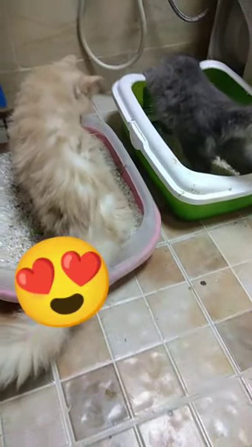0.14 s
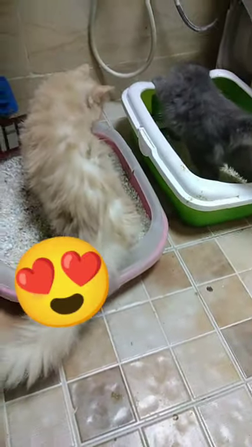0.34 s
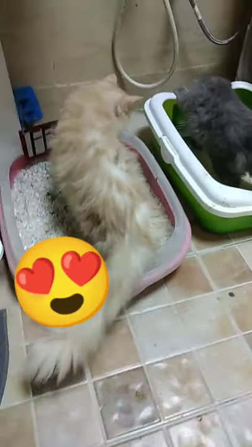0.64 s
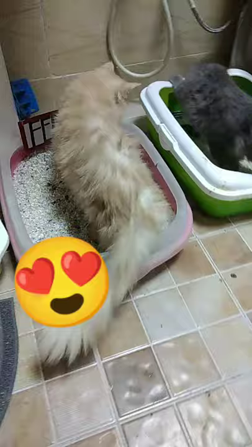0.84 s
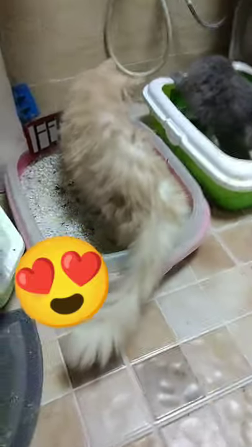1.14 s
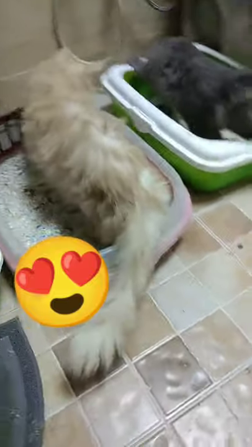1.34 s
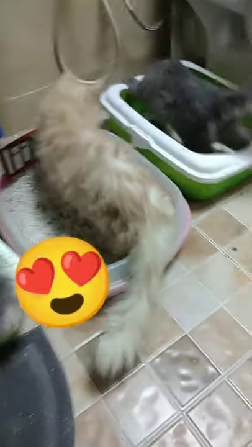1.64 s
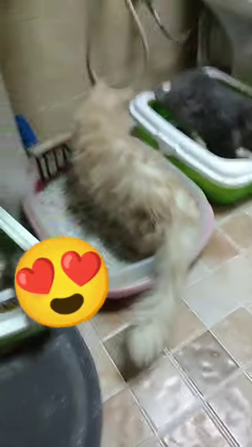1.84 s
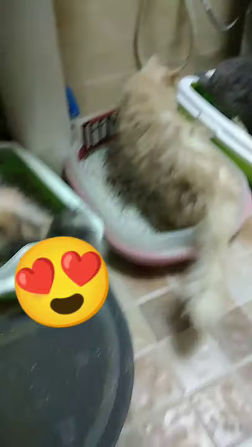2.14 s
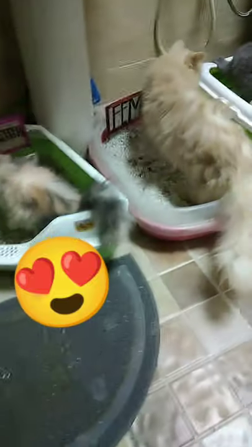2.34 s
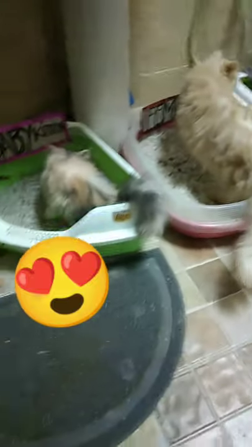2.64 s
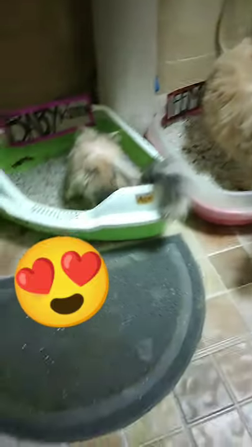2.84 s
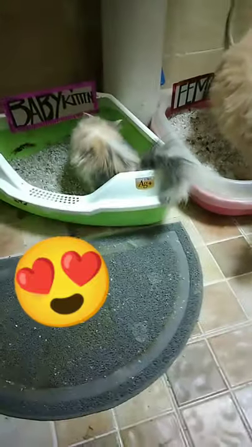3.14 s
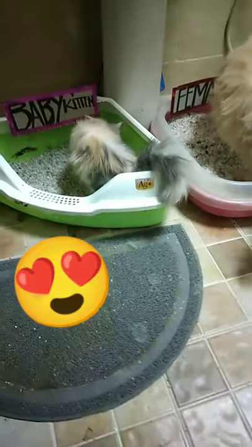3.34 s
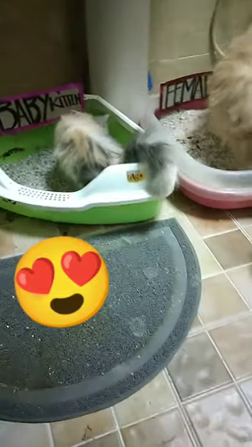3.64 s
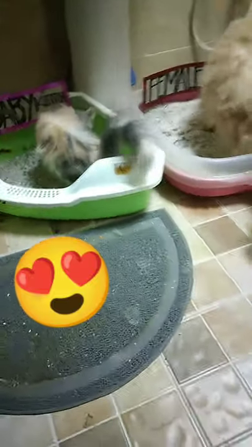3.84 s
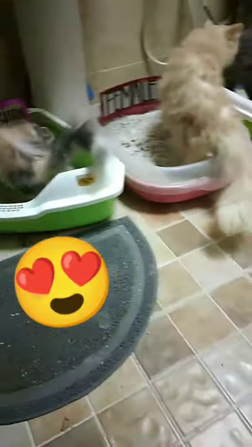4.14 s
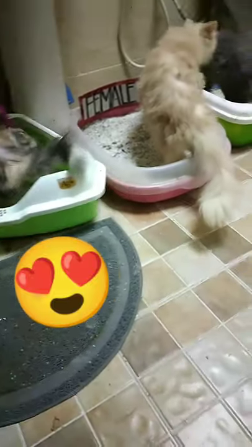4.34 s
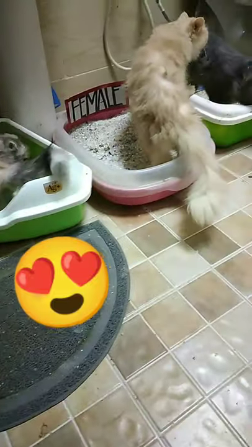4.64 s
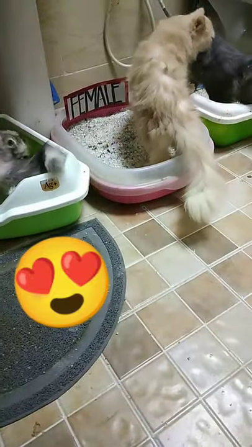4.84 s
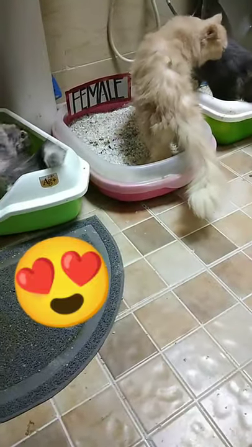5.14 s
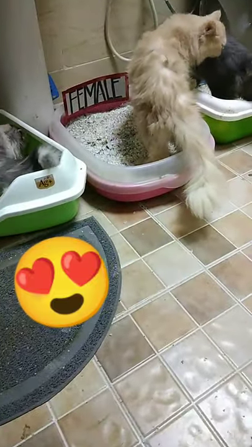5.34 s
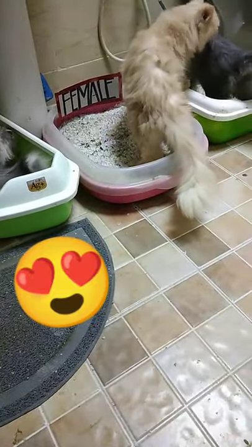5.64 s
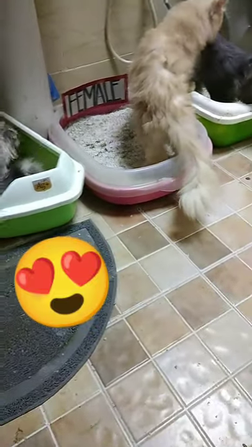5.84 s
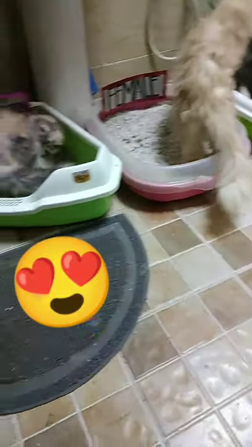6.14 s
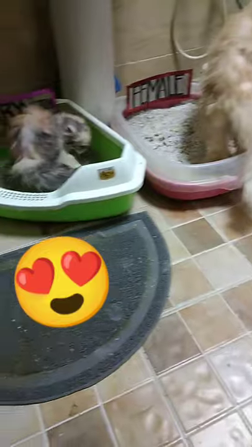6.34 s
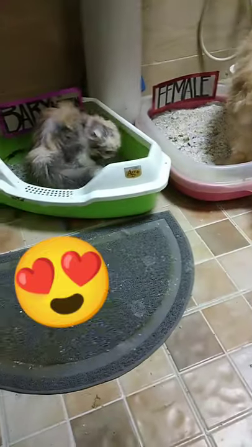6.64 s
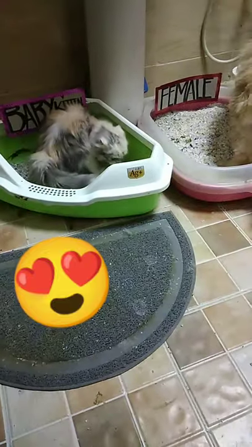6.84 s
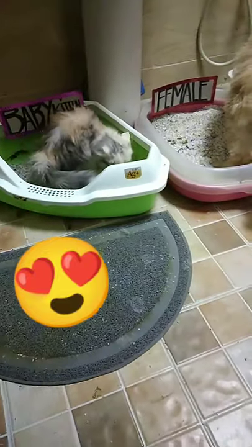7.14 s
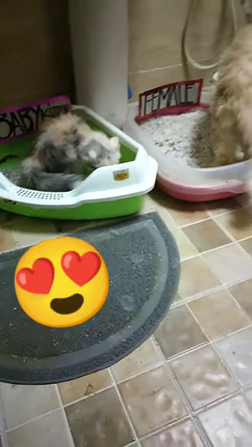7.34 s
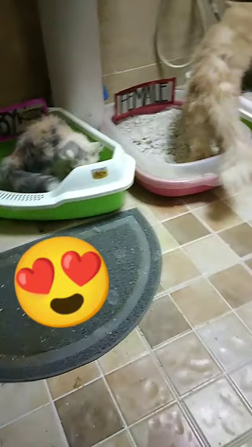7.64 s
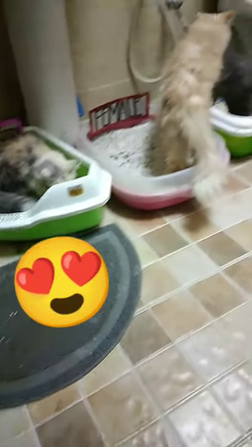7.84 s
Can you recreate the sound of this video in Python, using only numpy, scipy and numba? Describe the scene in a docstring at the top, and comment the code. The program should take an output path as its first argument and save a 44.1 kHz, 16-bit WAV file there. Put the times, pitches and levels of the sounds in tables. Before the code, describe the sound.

Over a low indoor hum, paws rake dry litter pellets in short crisp strokes, with plastic tray knocks and a loud clatter at the end.

```python
"""Cats dig and shift in granular litter in plastic trays on a tiled floor, a metre or two from a hand-held phone.
Pellets rattle in dense showers of tiny noisy impacts, with finer dust above and a ringing tray below.
Noise cracks tick on the tray walls and soft pushes ring its panels; motor tones hum and filtered air rumbles behind.
The phone turns slowly among the standing waves; its two ports ring at their own pitch. Faint treble drops out."""
import sys
import numpy as np
from scipy import signal
from scipy.fft import rfft, irfft
from scipy.io import wavfile
from scipy.ndimage import uniform_filter1d
from numba import njit

SR = 44100
rng = np.random.default_rng(int(sys.argv[2]) if len(sys.argv) > 2 else 0)


def decibels_to_gain(level_db):
    """Convert a level in decibels to a linear amplitude gain (20 dB per decade)."""
    exponent = np.asarray(level_db, float) / 20
    return 10 ** exponent


def pcm_store(signal):
    """Save signal as 16-bit PCM."""
    levels = np.round(np.clip(np.atleast_2d(signal), -1, 1) * 32767)
    wavfile.write(sys.argv[1], SR, levels.astype(np.int16).T)


N = 352359
T = np.arange(N) / SR
PORT_LAG = 20  # samples by which the right port hears the trays later


def level(x, db):
    """Set the rms level over all channels together."""
    return x * decibels_to_gain(db) / np.sqrt(np.mean(x ** 2))


def shape(table, hz):
    """Read (Hz, dB) points on a log-frequency axis."""
    f, db = np.transpose(table)
    return np.interp(np.log(hz + 1), np.log(f), db)


def colour(x, table):
    """Causal filter with the given spectrum, from the cepstrum of its log gain."""
    log_gain = np.log(decibels_to_gain(shape(table, np.arange(2049) * SR / 4096)))
    cep = irfft(log_gain)
    # folding the cepstrum forward in time gives minimum phase
    cep[1:2048] *= 2
    cep[2049:] = 0
    impulse = irfft(np.exp(rfft(cep)))[:2048]
    return signal.fftconvolve(x, np.atleast_2d(impulse), axes=-1)[:, :N]


def tail(t60_s, size=N // 8):
    """Scattered echoes that die away, different at each port; energy 1."""
    h = rng.standard_normal((2, size)) * 1000. ** (-T[:size] / t60_s)
    return h / np.sqrt(np.sum(h ** 2, axis=1, keepdims=True))


def walk(rate):
    """Random levels held 1 / rate s and slewed twice; spread near 1."""
    k = int(SR / rate)
    held = np.repeat(rng.standard_normal(N // k + 1), k)
    return 1.39 * uniform_filter1d(uniform_filter1d(held, k), k)[:N]


def sides(pan_db):
    """Left and right gains for a left minus right difference in dB."""
    return decibels_to_gain(np.array([pan_db, -pan_db]) / 2)


@njit
def svf(x, hz, sharp):
    """Band-pass whose centre moves; gain 1 at the centre."""
    y, b, l, k = np.empty(len(x)), 0., 0., 1 / sharp
    for i in range(len(x)):
        g = np.tan(np.pi * hz[i] / SR)
        v = (b + g * (x[i] - l)) / (1 + g * (g + k))
        b, l, y[i] = 2 * v - b, l + 2 * g * v, k * v
    return y


# Colour of the fan rumble, before and after the phone's turn.
# Each row: frequency in Hz, relative level in dB before, relative level in dB after.
RUMBLE_COLOUR = [(25, -47, -28), (57.6, -8.5, -15), (104, -17, -6), (136, -6, -3), (256, -2, -1.2),
                 (400, -6.5, -7.5), (730, -11.5, -8), (930, -19.5, -18), (1720, -30.5, -24.5),
                 (2300, -41, -40), (2700, -32.5, -35), (3800, -54, -51.5), (7200, -39.5, -32),
                 (14000, -49.5, -63.5)]


def air(turn):
    """Fan rumble; long waves are alike at both ports, short ones and the hand's deepest shake unrelated."""
    one, own = rng.standard_normal(N), rng.standard_normal((2, N))
    hz = np.arange(N // 2 + 1) * SR / N
    # likeness fades above some 560 Hz and again below 60 Hz
    alike = np.exp(-(hz / 560) ** 2) * .93 * np.minimum(.5 + hz / 120.0, 1)
    mix = irfft(np.sqrt(alike) * rfft(one) + np.sqrt(1 - alike) * rfft(own), N)
    left_lift = [(300, .1), (700, 0.89), (1300, 9.94), (2500, 5.8), (4400, 1.6)]  # (Hz, dB)
    mix[:1] = colour(mix[:1], left_lift)
    before, after = (colour(mix, np.array(RUMBLE_COLOUR)[:, [0, k]]) for k in (1, 2))
    flutter = decibels_to_gain(1.0 * walk(1.593))
    return level(before + (after - before) * turn, -48) * flutter


# Motor tones at multiples of twice the mains, some with a close neighbour that beats against them.
# Each row: multiple, offset in shaft turns, left level in dB before and after the phone's turn,
# right level in dB before and after, lead of the left port in radians.
MOTOR_TONES = [(1, -0.084, -65.5, -62, -71, -62.5, -0.18), (1, 0.35, -62.5, -57.5, -70.5, -58.5, 0.24),
               (2, -1, -64.5, -56.5, -66, -60.5, 0.4), (2, 0, -52, -61, -51, -54, 0.22),
               (3, -1, -50.5, -52.5, -47.5, -55, -0.35), (3, 0, -42, -49, -44, -47.5, 0.35),
               (4, 0, -55, -64, -52, -65.5, 0.27), (5, 0.1, -71.5, -73, -62.5, -66.5, 0.05),
               (6, 0, -67.5, -63, -85, -61.5, 0.4), (7, 0, -71.5, -70, -62, -62, -0.6),
               (8, 0.08, -64, -64.5, -82.5, -69.5, 1), (10, 0.19, -79, -76, -66, -67.5, 2.5)]
# A second, noisy tone. In order: pitch in Hz, width in Hz, level in dB before and after the phone's turn.
WAVERING_TONE = (239, 2.5, -69, -57)


def hum(turn):
    """Wavering motor tones whose standing waves change as the phone turns."""
    mains_hz, shaft_hz = 50.05, 18.85
    out = np.zeros((2, N))
    for (k, off, l0_db, l1_db, r0_db, r1_db, lead), start in zip(MOTOR_TONES, rng.random(len(MOTOR_TONES))):
        phase = 2 * np.pi * ((2 * k * mains_hz + off * shaft_hz) * T + start)
        # tones tied to the shaft waver with its speed
        phase = phase + off * 0.54 * walk(1.8)
        waver = np.sqrt(2) * decibels_to_gain(0.35 * k * walk(2.483) + 1.2 * walk(11))
        out[0] += waver * decibels_to_gain(l0_db + (l1_db - l0_db) * turn) * np.sin(phase + lead)
        out[1] += waver * decibels_to_gain(r0_db + (r1_db - r0_db) * turn) * np.sin(phase)
    hz, width, before_db, after_db = WAVERING_TONE
    drone = signal.lfilter(*signal.iirpeak(hz, hz / width, fs=SR), rng.standard_normal(N))
    return out + level(drone, 0) * decibels_to_gain(before_db + (after_db - before_db) * turn)


# Soft paw pushes on a tray.
# Each row: start in seconds, ring level in dB ahead of its fades, pitch in Hz, end pitch in Hz,
# 60 dB decay time in seconds, left minus right in dB.
PUSHES = [(.81, -61.5, 2700, 2700, 0.42, 6), (3.735, -36.5, 240, 225, 0.17, -5),
          (3.75, -45.5, 610, 600, 0.42, -3), (.47, -53, 560, 575, 0.81, 0), (.92, -48, 620, 615, 0.22, 0),
          (1.25, -49, 623, 560, 0.32, 4), (4.14, -43, 500, 400, 0.13, .1), (4.68, -58, 2430, 2360, 0.52, 7),
          (4.9, -53, 1790, 1720, 0.2, 7.5), (5.09, -58.5, 2060, 2000, 0.63, 10),
          (6.615, -46.5, 1290, 1080, 0.31, 8), (7.8, -41.5, 241, 224, 0.5, -2)]


def knocks():
    """A padded, rubbing push excites one panel of the tray."""
    out, rub = np.zeros((2, N)), rng.standard_normal(N)
    for s, db, hz, end_hz, t60_s, pan_db in PUSHES:
        i = int(s * SR)
        t = T[:min(SR // 2, N - i)]
        fade = 1000. ** (-t / t60_s)
        onset = 1 - np.exp(-t / (0.017 * t60_s))
        pitch_hz = end_hz + (hz - end_hz) * fade
        ring = level(svf(rub[i:i + len(t)], pitch_hz, 15.6), db)
        out[:, i:i + len(t)] += onset * fade * ring * sides(pan_db)[:, None]
    return out


# Single pellets and claws on the tray wall.
# Each row: start in seconds, crack level in dB ahead of the colours, left minus right in dB,
# tray boom in dB against the crack, snap in dB against the crack.
WALL_TICKS = [(0.924, -45, 16, -30, -6.5), (0.9953, -37.5, -2, -32, -15), (1.073, -34.5, -7, -13.5, -37),
              (1.217, -29, 7, -13, -35), (1.239, -33, -1, -13, -24), (1.34, -32, 2, -21, -25),
              (1.505, -41, 22, -9, -18), (1.827, -25, 1, -20, -18), (2.0272, -32.5, 9, 0.5, -19),
              (2.0404, -23.5, 10, -2, -25), (2.2566, -49, 8, -10, 2), (2.2849, -5, 9, -12, -9),
              (2.305, -21, 8, -20, -25), (2.5105, -46, 6, -13, -22), (2.744, -31.5, 19.5, -36, -37.5),
              (2.761, -30.5, 11.5, -16, -24), (2.801, -23, 19.5, -33, -16), (2.813, -26, 7, -13, -25),
              (2.820, -29, 5, -15, -25), (2.826, -22, 5, -20, -21), (2.834, -27, 5, -21, -23),
              (2.8387, -22, 4, -24, -28), (3.328, -36, 0, -13, -16), (3.439, -29, 4, 1, -30),
              (3.4472, -14.5, 14, -18, -33), (3.473, -26, 10, -28, -28), (3.489, -25, 8, -20, -28),
              (3.5707, -29.5, -6, -5.5, -25), (3.661, -20, 14, -30, -23), (3.696, -24, 12, -15, -26),
              (3.701, -26, 11, -18, -26), (3.719, -27, 5, -6, -26), (3.926, -37.5, 24, -20, -22),
              (4.0983, -32, 21.5, -16, -17), (4.1414, -37, 8.5, 2, -24), (4.158, -35.5, 5, -2.5, -25),
              (4.3972, -29, -2, -12, -18), (4.634, -32, 7, -25.5, -26), (4.9307, -33.5, 9.5, -24.5, -30.5),
              (5.7517, -39.5, -2.5, -4.5, -44), (6.101, -39, 13, -11.5, -16), (6.84, -36, 9, -15, -22),
              (6.96, -33, 6, -20, -22), (7.036, -33.5, 7, -15, -11), (7.5007, -33, 21.5, -23, -24),
              (7.5583, -26.5, 12, -13, -29), (7.7904, -26, -1, 1, -22), (7.8007, -12, -4, -2.5, -30),
              (7.804, -10.5, 0, -6, -28), (7.8254, -20, 7, -20, -22), (7.833, -2.5, 10, -37, -18),
              (7.8343, -8, 6, -3.5, -26), (7.954, -20, 5, -25, -24)]
# Colour of the bright crack. Each row: frequency in Hz, relative level in dB.
CRACK_COLOUR = [(3500, -32.5), (5000, -12.5), (6500, 0), (8000, -0.5), (9500, -6.5), (11000, -20),
                (13000, -43.5)]
# Colour of the dull tray wall. Each row: frequency in Hz, relative level in dB.
WALL_COLOUR = [(700, -23.5), (1300, -6), (1900, -2), (2600, -3.5), (3700, -8.5), (4800, -4), (6200, -20.5)]
# Colour of the snap, and of the fine dust in the digging. Each row: frequency in Hz, relative level in dB.
DUST_COLOUR = [(8000, -27.5), (9500, 3), (11000, 2), (12500, -6.5), (14500, -13.5), (16000, -22)]


def ticks():
    """Each tick is a crack of a few milliseconds, with its own fine grain, then the tiled room."""
    bright, dull, snap = np.zeros((3, 2, N + 1024))
    fade = 1000. ** (-T[:1024] / 0.013)
    grains = rng.standard_normal((len(WALL_TICKS), 3, 1024))
    for (s, db, pan_db, tray_db, snap_db), grain in zip(WALL_TICKS, grains):
        i = int(s * SR)
        # part of the crack is common to both ports, the right one a little later
        crack = level((grain[0] + 1.02 * grain[1:]) * fade, db) * sides(pan_db)[:, None]
        crack[1] = np.roll(crack[1], PORT_LAG)
        bright[:, i:i + 1024] += crack
        dull[:, i:i + 1024] += crack * decibels_to_gain(tray_db)
        # the highest part dies first
        snap[:, i:i + 1024] += crack * fade * decibels_to_gain(snap_db)
    direct = decibels_to_gain(-23) * colour(bright, CRACK_COLOUR)
    direct = direct + decibels_to_gain(-7.5) * colour(dull, WALL_COLOUR)
    direct = direct + decibels_to_gain(-7.5) * colour(snap, DUST_COLOUR)
    return direct + decibels_to_gain(-8.5) * signal.fftconvolve(direct, tail(0.42), axes=-1)[:, :N]


def shower(per_s, spread_db, smear_s, room_db, alike):
    """Pellet collisions of very uneven size all over the trays, blurred by the walls and the tiles."""
    # three streams, each with per_s hits a second: one shared, one for each port
    hit = rng.random((3, N)) < per_s / SR
    size_db = spread_db * np.minimum(rng.exponential(size=(3, N)), 4.5)
    grains = hit * rng.standard_normal((3, N)) * decibels_to_gain(size_db)
    # some fall where both ports hear them alike, some nearer to one
    shared = np.array([grains[0], np.roll(grains[0], PORT_LAG)])
    grains = alike * shared + grains[1:]
    echo = tail(smear_s)[:1] + decibels_to_gain(room_db) * tail(0.2)
    return signal.fftconvolve(grains, echo, axes=-1)[:, :N]


# Cats shifting their weight: a continuous bed, gliding from row to row.
# Each row: time in seconds, relative pellet rattle in dB, tray boom in dB against the rattle,
# fine dust in dB against the rattle, left minus right in dB, tray resonance in Hz about which the ring drifts.
WEIGHT_SHIFTS = [(0, -79, 10, -12, 9, 2360), (.7, -81.5, -1, -9.5, 10, 2370),
                 (.8, -72.5, -7, -26, 14, 2700), (1.0, -60, -5, -11.5, 4, 2390),
                 (1.145, -58, -10.5, -19.5, 4.5, 2800), (1.19, -54, -1, -18, 8.5, 2950),
                 (1.38, -53.5, 0, -20.5, 7.5, 3030), (1.5, -62, 1, -14, 7.5, 2800),
                 (1.65, -64, -4, -18, 9.5, 2460), (2.701, -66, -11, -24, 20, 2350),
                 (3.2, -71, 3, -27.5, 17, 2380), (4.0, -59.5, -3.5, -28, 7, 2460),
                 (5.3, -65.5, 0, -25, 9.5, 2320), (6.35, -63.5, -2.5, -34.5, 10, 2300),
                 (6.6, -62, -9, -29, 6, 2410), (6.8, -60, 3, -28, 8, 2420),
                 (7.03, -55.5, 3.5, -19.5, 4.5, 2080), (7.26, -57, 2.5, -15, 4, 2220),
                 (7.42, -63, 1, -25, 6.5, 2300), (8, -56, -7, -24, 7, 2860)]
# Paw strokes through the litter.
# Each row: start in seconds, push length in seconds, relative pellet rattle in dB, tray boom in dB against
# the rattle, fine dust in dB against the rattle, left minus right in dB of the push and fast drop.
PAW_STROKES = [(0.149, 0.024, -68, -18, -17, 12), (0.345, 0.026, -67, -11, -22, 7),
               (0.598, 0.04, -68, -16, -20, 7), (0.71, 0.034, -64.5, -14.5, -20, 1),
               (0.882, .03, -69, -15, -20, 4), (1.809, .04, -37.5, -7.5, -15, 3.5),
               (2.023, 0.021, -42, 0, -15, 8), (2.279, 0.021, -35.5, -2, -30, 1),
               (2.496, 0.03, -47, -5.5, -15, 12), (2.78, 0.05, -34, -7.5, -17, 6),
               (3.295, 0.053, -53, -6, -19, 4), (3.424, 0.045, -35, -8, -17, 4),
               (3.59, 0.072, -40, -9.5, -13, 13.5), (3.689, 0.025, -43.5, -5.5, -19, 5),
               (4.138, 0.035, -56, -4.5, -13, 5), (4.389, 0.012, -55.5, -14, -15, 11),
               (4.626, 0.01, -59, -17, -35, 7), (4.924, 0.012, -58.5, -11.5, -35, 8),
               (5.082, 0.015, -56.5, -14, -44, 3), (5.33, 0.023, -65, -20, -31, 8),
               (5.47, 0.013, -61, -12, -36, -3), (5.758, 0.015, -54, -14, -40, -2),
               (6.094, 0.015, -56, -10.5, -16, 12), (6.377, 0.059, -67, -2.5, -26.5, 0.5),
               (6.669, 0.052, -67.5, 2, -6.5, 13), (6.81, 0.033, -59.5, -6, -35, 9),
               (7.137, 0.063, -50.5, -4, -18.5, 0), (7.547, 0.037, -38, -6, -13.5, 7.5),
               (7.779, 0.032, -36.5, -2.5, -12, 18), (7.815, .022, -21.5, -3.5, -21, 4.5)]


def stirring():
    """Left and right strength of rattle, tray and dust; unrelated stirrings add as power."""
    s, *columns = np.transpose(WEIGHT_SHIFTS)
    db, tray_db, dust_db, pan_db, ring_hz = (np.interp(T, s, c) for c in columns)
    power = (decibels_to_gain(db + np.array([0 * db, tray_db, dust_db]))[:, None] * sides(pan_db)) ** 2
    # the push swells, the pellets drop back fast, then trickle on at a fixed pan, the tray ringing longer
    swell_power, drop_db_per_s, trickle_db_per_s, trickle_db, trickle_pan_db = 0.78, 299, 81.5, -7, 3
    lasting = decibels_to_gain(np.array([0, 4.5, 1.5]))[:, None, None]  # trickle gain in dB: rattle, tray, dust
    for start, push_s, db, tray_db, dust_db, pan_db in PAW_STROKES:
        i = int(start * SR)
        t = T[:min(SR, N - i)]
        swell, after = np.minimum(t / push_s, 1) ** swell_power, np.maximum(t - push_s, 0)
        parts = decibels_to_gain(db + np.array([0, tray_db, dust_db]))[:, None, None] * swell
        drop = decibels_to_gain(-drop_db_per_s * after) * sides(pan_db)[:, None]
        # faint strokes are farther off, so more of them lingers, and for longer
        under_near_db = -37 - db
        lingering_db = min(trickle_db + 0.3 * under_near_db, 0)
        slowing = 1 + 0.025 * max(under_near_db, 0)
        trickle = decibels_to_gain(lingering_db - trickle_db_per_s / slowing * after) * sides(trickle_pan_db)[:, None]
        power[..., i:i + len(t)] += parts ** 2 * (drop ** 2 + (lasting * trickle) ** 2)
    return np.sqrt(power), ring_hz


# Colour of the pellet rattle. Each row: frequency in Hz, relative level in dB.
PELLET_COLOUR = [(3000, -35), (4500, -2.5), (6000, 0), (8000, -2), (9500, -10), (11000, -14.5),
                 (13000, -41.5)]
# Colour of the tray under the litter. Each row: frequency in Hz, relative level in dB.
TRAY_COLOUR = [(700, -20), (1200, -6), (1600, -1), (1950, -4), (2250, -8.5), (2700, -4), (3250, -2),
               (3750, -8), (4300, -7.5), (5000, -8.5), (5500, -10.5), (6200, -22.5)]


def digging():
    """Paws push pellets: a bright rattle, finer dust above, and the tray below, whose ring drifts in pitch."""
    (rattling, booming, dusting), ring_hz = stirring()
    pellets = shower(2500, 2.74, 0.004, -3.5, 0.8)
    rattle = level(colour(pellets, PELLET_COLOUR), -6.5)
    dust = level(colour(pellets, DUST_COLOUR), 4.2)

    ring_hz = ring_hz * (1 + 0.018 * walk(9))
    tray = shower(1100, 3.7, 0.0061, -3, 1.43)
    ringing = np.array([svf(x, ring_hz, 4.7) for x in tray])
    tray = level(colour(tray + decibels_to_gain(7) * ringing, TRAY_COLOUR), 0.066)

    # uneven pushing, in dB: shared by both ports, then each port's own
    shared_db = 0.55 * walk(40) + 1.6 * walk(12)
    own_db = np.array([2.03 * walk(6), 1.3 * walk(6)])
    bright = (rattling * rattle + dusting * dust) * decibels_to_gain(shared_db + own_db)
    boom = booming * decibels_to_gain(1.03 * walk(30)) * tray * sides(-1.65)[:, None]
    return bright + boom


# How far the phone has turned. Each row: time in seconds, share of the turn from 0 to 1.
PHONE_TURN = [(0, 0.04), (1.5, 0.17), (2.3, 0.22), (2.75, 0.6), (3.5, 0.94), (4.5, 0.8), (8, 1)]


def scene():
    """Litter, ticks and knocks over the hum and the rumbling air."""
    turn = np.clip(np.interp(T, *np.transpose(PHONE_TURN)), 0, 1)
    return digging() + ticks() + knocks() + hum(turn) + air(turn)


# Threshold about which a faint band drops out. Each row: frequency in Hz, level in dB.
DROPOUT_THRESHOLD = [(1400, -120), (1900, -81), (2700, -82), (3700, -80.5), (4400, -84.5), (5300, -84),
                     (6500, -81), (8500, -83), (10000, -86), (15000, -99)]


def band_dropouts(x):
    """Narrow bands under a fickle threshold drop out; little passes above the top."""
    top_hz = 14350
    hz, s, z = signal.stft(x, SR, nperseg=2048)
    # one power for each group of eight bins
    power = uniform_filter1d(np.abs(z) ** 2, size=8, axis=1, origin=-4)[:, ::8]
    fickle_db = 5.34 * uniform_filter1d(rng.standard_normal(power.shape), size=2, axis=2)
    over = power / decibels_to_gain(2 * (shape(DROPOUT_THRESHOLD, hz[::8])[:, None] + fickle_db))
    gain = 1 / (1 + (over + 1e-9) ** -3.5)
    # a closing band keeps part of its gain for one more frame
    gain[..., 1:] = np.maximum(gain[..., 1:], 0.41 * gain[..., :-1])
    gain = gain.repeat(8, axis=1)[:, :len(hz)] * np.where(hz < top_hz, 1, .1)[:, None]
    return signal.istft(z * gain, SR, nperseg=2048)[1][:, :N]


# Microphone ports, left then right. Each row: resonance in Hz, width in Hz, lift in dB.
PORT_RINGS = [(8030, 1450, 11), (6790, 1210, 15)]
# The hand and body of the phone shade the right port. Each row: frequency in Hz, gain in dB.
HAND_SHADE = [(5000, -0.33), (7500, -2), (9000, -1), (14000, -6)]


def ports(x):
    """Each port's resonance lifts a band of its own; the right one is shaded."""
    ported = np.zeros_like(x)
    for side, (hz, width, db) in enumerate(PORT_RINGS):
        ring = signal.lfilter(*signal.iirpeak(hz, hz / width, fs=SR), x[side])
        ported[side] = x[side] + (decibels_to_gain(db) - 1) * ring
    ported[1:] = colour(ported[1:], HAND_SHADE)
    return ported


def low_pass(x):
    """Removes everything above the highest recorded frequency."""
    return signal.sosfilt(signal.butter(12, 15550, fs=SR, output="sos"), x)


def record(dry):
    """Port resonances, dropouts in faint bands, a trace of electronic hiss."""
    ported = ports(dry)
    hiss_colour = [(2000, 4.5), (4000, 0.0), (6000, -2.0), (9000, -8), (10000, -4.5),
                   (14000, -7.0), (14600, -46.0)]  # (Hz, relative dB)
    hiss = level(colour(rng.standard_normal((2, N)), hiss_colour), -79)
    mix = np.clip(band_dropouts(ported) + hiss, -1, 1)
    return low_pass(mix)


dry = scene()
out = record(dry)
pcm_store(out)
```